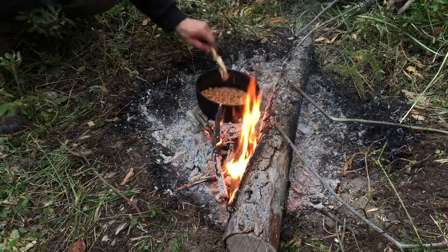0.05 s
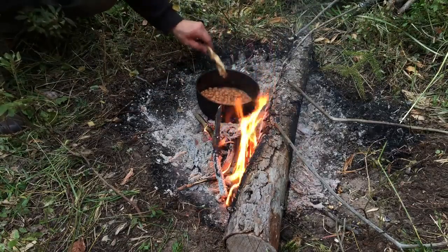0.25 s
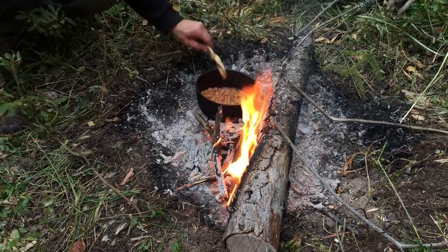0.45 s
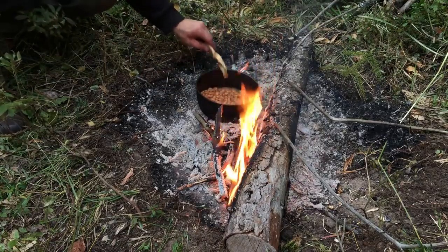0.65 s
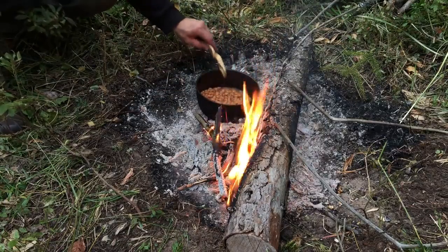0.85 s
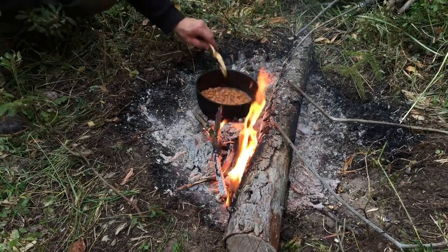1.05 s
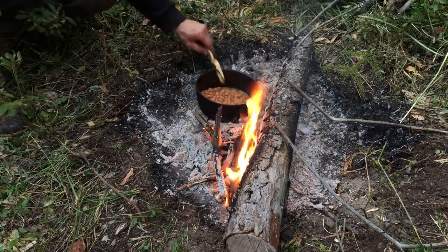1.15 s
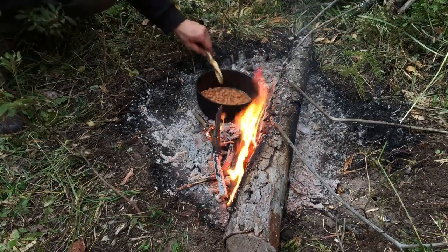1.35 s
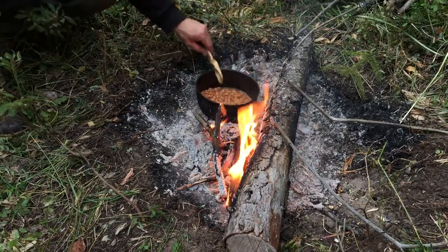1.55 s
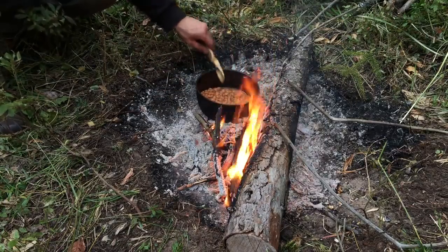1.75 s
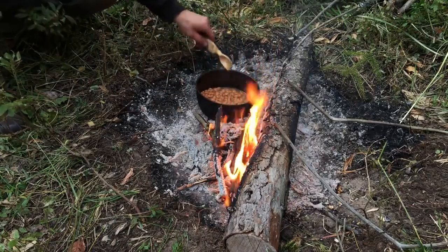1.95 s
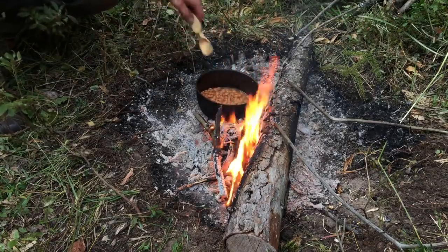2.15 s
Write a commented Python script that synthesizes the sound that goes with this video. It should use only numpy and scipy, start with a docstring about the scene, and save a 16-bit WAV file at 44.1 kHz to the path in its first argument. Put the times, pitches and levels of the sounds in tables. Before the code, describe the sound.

Close and loud outdoors, wood knocks on a bean-filled iron pot about five times a second, with little rattling bounces and a short metallic ring; fire snaps between, and the loudest peaks overload the microphone.

```python
"""A wooden spoon is rapped nine times on the rim of an iron pot of beans over a campfire.
Each rap is a click with a low thud, bounces and chatter that ring the wood, and beating pot modes.
Burning wood pops (shaped pulses), ticks (random small pops) and once spits gas (a noise burst).
Filtered noise makes quiet outdoor air, wavering sines a faint low hum; the loudest peaks clip."""
import sys
import numpy as np
from scipy import signal
from scipy.fft import rfft, irfft
from scipy.io import wavfile

SR = 44100
rng = np.random.default_rng(int(sys.argv[2]) if len(sys.argv) > 2 else 0)


def pcm_store(signal):
    """Save signal as 16-bit PCM."""
    levels = np.round(np.clip(np.atleast_2d(signal), -1, 1) * 32767)
    wavfile.write(sys.argv[1], SR, levels.astype(np.int16).T)


N = 94815

# outdoor air spectrum, relative: freq_hz, density_db
AIR_SPECTRUM = [(20, -39), (45, -18), (85, -2), (170, -7), (330, -16.5), (700, -20.5), (1500, -21.5),
                (3000, -21.5), (6000, -28), (10000, -33.5), (16000, -27)]
# hum lines: freq_hz, level_db
HUM_LINES = [(91, -59.5), (137, -61), (228, -80), (273, -68.5)]
# wood pops; the treble falls above the corner, or rises if the slope is negative:
# start_s, level_db, corner_hz, slope_db_per_octave, thump_db, swing_hz
FIRE_POPS = [(0.0978, -2.5, 2800, 12.5, 0, 1320), (0.152, -41, 5960, 4, -8, 2000),
             (0.53, -21.5, 1860, 10.5, -2, 1210), (0.9355, -2, 4400, 13.5, -2.5, 730),
             (1.192, -41, 4120, 18, 6.5, 2000), (1.3857, -26, 1550, 12, -18, 1230),
             (1.4178, 17.5, 3940, 4, -12.5, 724), (1.7495, 6.5, 2200, 5.5, -3, 1135),
             (1.8300, -40, 8000, -10.5, -2.5, 2000)]
# jet of gas from the log: level_db, t60_s, centre_hz, width_hz
GAS_SPIT = (-14, 0.03, 13008.5, 3001.5)
# raps, levels relative: start_s, knock_db, wood_db, chatter_db, thud_db,
# pot_group_a_db, pot_group_b_db, pot_group_c_db, pot_group_d_db
SPOON_RAPS = [(0.2059, 13, 2.5, -15, 9.5, -3.5, 3.5, -7.5, 0),
              (0.4041, 5.5, -2, 0, 4.5, -10.5, 0, -5.5, -1.5),
              (0.6131, 8, 1, -0.5, -4.5, -13.5, 0.5, -3, -7),
              (.8226, -1, -5.5, -0.5, -10, -4.5, -2, -5, -6),
              (1.0245, 2.5, -6.5, -14.5, -4, -3.5, 2, -3.5, -3.5),
              (1.2163, 9, -4.5, -2.5, -15.5, 0, -5, -12, -4.5),
              (1.4204, 12, 0.5, 2, -10.5, -15.5, -4.5, 1, -8.5),
              (1.6464, 5.5, -1.5, -0.5, -7.5, -6, 2, -2.5, -2),
              (1.8667, -3, -5.5, 3, -22.5, -7.5, -19.5, -4.5, -7)]
# spoon bouncing back on the rim, relative: start_s, level_db
RIM_BOUNCES = [(.4120, -3.5), (0.4341, -25), (0.622, -2.5), (.6318, -12), (0.8365, -9.5), (.8482, -19),
               (0.8578, -23), (1.0380, -4.5), (1.058, -18.5), (1.2274, -15), (1.2288, -6), (1.2417, -13),
               (1.2479, -16), (1.2551, -23.5), (1.4297, -0.5), (1.4342, -1.5), (1.4392, -15.5),
               (1.4431, -19), (1.6563, -15.5), (1.6601, -5.5), (1.6706, -0.5), (1.6748, -14), (1.8782, -10),
               (1.8865, -10), (1.8916, -11)]
# spoon modes before the grip's scatter: freq_hz, level_db, t60_s
SPOON_MODES = [(691, -17, 0.014), (1560, -14, 0.047), (1775, -12.5, 0.022), (2232, -2, 0.031),
               (2889, -6, 0.023), (3475, -6, .025), (9440, -24.5, 0.0087)]
# contact click spectrum, relative: freq_hz, density_db
CLICK_SPECTRUM = [(30, -17.5), (150, -11.5), (300, -0.5), (480, -4.5), (700, 6), (1300, 5.5), (2200, 10),
                  (3800, 2), (5500, -9.5), (9500, -6), (11000, -16.5), (16000, -33)]
# pot modes; a group answers alike to the spot struck, the twin level is relative to its mode:
# freq_hz, level_db, t60_s, twin_split_hz, twin_db, group
POT_MODES = [(187.2, -36, 0.3, 2.6, -18.5, "A"), (590, -39, 0.47, 3.3, -21.5, "A"),
             (1093, -31, 0.48, 1.2, -12.5, "A"), (1742, -29, .45, 8.5, -3, "B"),
             (2501.5, -18.5, 0.25, 4, -24, "A"), (3267.4, -11, 0.24, 1.3, -40.5, "C"),
             (4035, -9, .21, 0.86, -18.5, "D"), (4726, -21, .18, 15, -4, "A"),
             (5398, -17.5, 0.1, 1.6, -29.5, "D"), (5980, -27, .1, 3.7, -12.5, "D")]
# scatter from ground and trees, level before scaling by bandwidth: low_hz, high_hz, level_db, t60_s
NEAR_SCATTER = [(100, 1500, -19, .035), (1500, 6000, -19, .035), (6000, 16000, -14, .055)]
FAR_SCATTER = [(100, 1500, -41, .4), (1500, 6000, -43, .4), (6000, 16000, -34, .35)]

AIR_DB = -57
HUM_WAVER = 0.14  # rms level swing as a fraction, rms phase drift in radians

THUMP_DB, THUMP_HZ, THUMP_T60_S = -28.5, 125, 0.037
POP_LOW_HZ = 60.5
POP_SPLIT_DB = -6  # the air swings back half a cycle after the burst
POP_GROUND_S, POP_GROUND_DB = 0.0024, -17.5
POP_SCATTER_DB, POP_SCATTER_T60_S = -6, 0.014
SPIT_START_S = 1.4192
TICKS_PER_S, TICKS_DB, TICKS_SPREAD_DB = 31, -55, -7.5

CLICK_DB, BOUNCE_CLICK_DB, BOUNCE_SPOON_DB = 2, 0.5, -12
THUD_DB, THUD_HZ, THUD_T60_S = -29.5, 45, 0.029
GRIP_DETUNE, GRIP_SPREAD_DB = 0.012, 5.5  # detune is a fraction of pitch
CHATTER_PER_S, CHATTER_DB, CHATTER_SPREAD_DB = 410, -13.5, 4.5
CHATTER_START_S, CHATTER_HOLD_S, CHATTER_FALL_DB_PER_S = 0.0078, 0.021, 846.5
SOFT_CONTACT_HZ = 10100  # light chatter is duller than a full blow

RING_RISE_S = 0.001
BEAT_CREST_S, BEAT_SPREAD_RAD = 0.075, 0.5
RETOUCH_DB = 25.5  # each new rap damps the ring of the one before
# the spoon rests on the rim and chokes the high ring
CHOKE_START_S, CHOKE_LENGTH_S, CHOKE_DB, CHOKE_ABOVE_HZ = 1.468, 0.02, 16.5, 2800

CLIP_LEVEL, EDGE_HZ = 0.99, 16200


def amp(db):
    """Decibels to gain."""
    return 10 ** (np.asarray(db) / 20)


def unit(x):
    """Scales to rms 1."""
    return x / np.sqrt(np.mean(x ** 2) + 1e-20)


def read(points, hz):
    """Reads a spectrum on a log-frequency axis."""
    f, db = np.transpose(points)
    return np.interp(np.log(hz + 1), np.log(f + 1), db)


def fade(t, t60_s):
    """Exponential decay, 60 dB in t60_s."""
    return np.exp(-np.log(1000) * t / max(t60_s, 1e-4))


def add(mix, start_s, sound):
    """Mixes a sound in at a time."""
    part = mix[max(round(start_s * SR), 0):][:len(sound)]
    part += sound[:len(part)]


def through(x, response):
    """Convolves and keeps the scene's length."""
    return signal.fftconvolve(x, response)[:N]


def band(x, lo_hz, hi_hz):
    """Band-pass."""
    sos = signal.butter(2, [lo_hz, min(hi_hz, SR / 2 - 1)], "band", fs=SR, output="sos")
    return signal.sosfilt(sos, x)


def pulse(colour, size=4096):
    """Causal minimum-phase pulse of peak 1 whose spectrum is colour(Hz) in relative dB."""
    hz = abs(np.fft.fftfreq(size, 1 / SR))
    log_gain = np.log(amp(np.maximum(colour(hz), -100)))
    spectrum = np.exp(np.conj(signal.hilbert(log_gain)))
    h = np.fft.ifft(spectrum).real[:size // 2]
    return h / abs(h).max()


def thud(hz, t60_s):
    """A short low push of air: a decaying sine."""
    t = np.arange(SR // 8) / SR
    return fade(t, t60_s) * np.sin(2 * np.pi * hz * t)


def shaped_noise(gain):
    """Noise of rms 1 with the given gain per frequency bin."""
    return unit(irfft(rfft(rng.standard_normal(N)) * gain, N))


def air():
    """Quiet outdoor air: steady noise with a fixed spectrum."""
    hz = np.fft.rfftfreq(N, 1 / SR)
    return amp(AIR_DB) * shaped_noise(amp(read(AIR_SPECTRUM, hz)))


def hum():
    """Low sines, each wavering slowly in level and phase."""
    t = np.arange(N) / SR
    slow = np.exp(-(np.fft.rfftfreq(N, 1 / SR) / 6) ** 2)
    out = np.zeros(N)
    for line_hz, level_db in HUM_LINES:
        swell, drift = shaped_noise(slow), shaped_noise(slow)
        tone = np.sin(2 * np.pi * line_hz * t + HUM_WAVER * drift)
        out += amp(level_db) * unit((1 + HUM_WAVER * swell) * tone)
    return out


def pop(level_db, corner_hz, slope_db, thump_db, swing_hz):
    """A pocket in the wood bursts: a sharp double pulse, its ground echo, a short scatter and a puff."""
    def colour(hz):
        treble_db = -slope_db / 2 * np.log2(1 + (hz / corner_hz) ** 2)
        low_cut_db = -20 * np.log10(1 + (POP_LOW_HZ / (hz + 1)) ** 2)
        return treble_db + low_cut_db

    crack = pulse(colour, size=8192)
    t = np.arange(len(crack)) / SR
    paths = rng.standard_normal(len(t)) * fade(t, POP_SCATTER_T60_S)
    paths *= amp(POP_SCATTER_DB) / np.linalg.norm(paths)
    add(paths, 0, np.ones(1))
    add(paths, 0.5 / swing_hz, -amp([POP_SPLIT_DB]))
    add(paths, POP_GROUND_S, amp([POP_GROUND_DB]))
    burst = signal.fftconvolve(crack, paths)
    add(burst, 0, amp(THUMP_DB + thump_db) * thud(THUMP_HZ, THUMP_T60_S))
    return amp(level_db) * burst


def spit():
    """A jet of gas from the log: a decaying burst of band noise."""
    level_db, t60_s, centre_hz, width_hz = GAS_SPIT
    t = np.arange(SR // 20) / SR
    hiss = band(rng.standard_normal(len(t)), centre_hz - width_hz / 2, centre_hz + width_hz / 2)
    return amp(level_db) * fade(t, t60_s) * unit(hiss)


def ticks():
    """Tiny pops of one shape at random times and levels."""
    struck = rng.random(N) < TICKS_PER_S / SR
    level_db = TICKS_DB + TICKS_SPREAD_DB * np.minimum(rng.exponential(1, N), 3)
    tick = pop(0, corner_hz=7000, slope_db=0.5, thump_db=-23, swing_hz=2000)
    return through(struck * amp(level_db), tick)


def fire():
    """Pops of burning wood, one spit of gas and a sprinkle of ticks."""
    out = ticks()
    for start_s, *shape in FIRE_POPS:
        add(out, start_s, pop(*shape))
    add(out, SPIT_START_S, spit())
    return out


def wood():
    """Decaying modes of the spoon; the grip shifts their pitch and level at random."""
    t = np.arange(SR // 8) / SR
    out = np.zeros(len(t))
    for hz, level_db, t60_s in SPOON_MODES:
        level_shift, pitch_shift = rng.standard_normal(2)
        tone = np.sin(2 * np.pi * hz * (1 + GRIP_DETUNE * pitch_shift) * t)
        out += amp(level_db + GRIP_SPREAD_DB * level_shift) * fade(t, t60_s) * tone
    return out


def add_chatter(mix, start_s, chatter_db):
    """Adds 48 light contacts of random gap, size and sign, dying away after a hold."""
    delays_s = CHATTER_START_S + np.cumsum(2 * rng.random(48)) / CHATTER_PER_S
    for delay_s, size in zip(delays_s, rng.standard_normal(48)):
        fall_db = CHATTER_FALL_DB_PER_S * max(delay_s - CHATTER_HOLD_S, 0)
        level_db = CHATTER_DB + chatter_db - fall_db + CHATTER_SPREAD_DB * size
        add(mix, start_s + delay_s, rng.choice([-1, 1]) * amp([level_db]))


def spoon():
    """Each rap, its bounces and the dying chatter click and ring the wood."""
    blows, rattle, chatter, body = np.zeros((4, N))
    for start_s, knock_db, wood_db, chatter_db, thud_db, *_ in SPOON_RAPS:
        add(blows, start_s, amp([knock_db]))
        add(body, start_s, amp(wood_db) * wood())
        add(body, start_s, amp(THUD_DB + thud_db) * thud(THUD_HZ, THUD_T60_S))
        add_chatter(chatter, start_s, chatter_db)
    for start_s, level_db in RIM_BOUNCES:
        add(rattle, start_s, amp([level_db]))
        add(body, start_s, amp(level_db + BOUNCE_SPOON_DB) * wood())
    chatter = band(chatter, lo_hz=181, hi_hz=SOFT_CONTACT_HZ)
    contacts = amp(CLICK_DB) * blows + amp(BOUNCE_CLICK_DB) * (rattle + chatter)
    clicks = through(contacts, pulse(lambda hz: read(CLICK_SPECTRUM, hz)))
    chatter_ring = amp(BOUNCE_SPOON_DB) * through(chatter, wood())
    return body + chatter_ring + clicks


def pot():
    """The iron rings in beating pairs of modes; their balance shifts with the spot struck."""
    t = np.arange(SR * 3 // 4) / SR
    out = np.zeros(N)
    next_starts_s = [row[0] for row in SPOON_RAPS[1:]] + [np.inf]
    for (start_s, _, _, _, _, *group_db), next_s in zip(SPOON_RAPS, next_starts_s):
        scene_s = start_s + t
        choke_depth = np.clip((scene_s - CHOKE_START_S) / CHOKE_LENGTH_S, 0, 1)
        choke = amp(-CHOKE_DB * choke_depth * (start_s < CHOKE_START_S))  # only earlier raps
        retouch = amp(-RETOUCH_DB * np.clip((scene_s - next_s) / RING_RISE_S, 0, 1))
        gate = np.minimum(t / RING_RISE_S, 1) * retouch
        for hz, level_db, t60_s, split_hz, twin_db, group in POT_MODES:
            phase = 2 * np.pi * (hz * t + rng.random())
            beat = 2 * np.pi * split_hz * (t - BEAT_CREST_S) + BEAT_SPREAD_RAD * rng.standard_normal()
            pair = np.sin(phase) + amp(twin_db) * np.sin(phase + beat)
            ring_db = level_db + group_db["ABCD".index(group)]
            ring = amp(ring_db) * pair * fade(t, t60_s) * gate
            add(out, start_s, ring * choke if hz > CHOKE_ABOVE_HZ else ring)
    return out


def scatter(x, bands):
    """Diffuse reflections: decaying noise, each band with its own level and decay."""
    t = np.arange(SR // 2) / SR
    tail = np.zeros(len(t))
    for lo_hz, hi_hz, level_db, t60_s in bands:
        h = band(rng.standard_normal(len(t)), lo_hz, hi_hz)
        h *= fade(t, t60_s) * np.minimum(t / 0.0015, 1)
        share = np.sqrt(abs(hi_hz - lo_hz) / (SR / 2))
        tail += amp(level_db) * share * h / np.linalg.norm(h)
    return through(x, tail)


def scene():
    """Spoon, pot and fire with outdoor scatter, over air and hum."""
    knocks = spoon()
    close = knocks + scatter(knocks, NEAR_SCATTER) + pot() + fire()
    return (close + scatter(close, FAR_SCATTER) + air() + hum())[None]


def record(dry):
    """The microphone overloads: the loudest peaks clip; then a low-pass sets the band limit."""
    clipped = np.clip(dry, -CLIP_LEVEL, CLIP_LEVEL)
    low_pass = signal.firwin(255, EDGE_HZ, window=("kaiser", 9), fs=SR)
    return signal.oaconvolve(clipped, low_pass[None], "same")


dry = scene()
out = record(dry)
pcm_store(out)
```